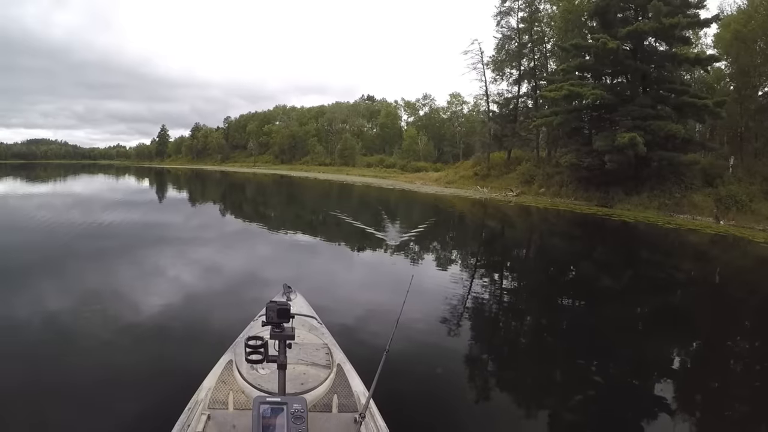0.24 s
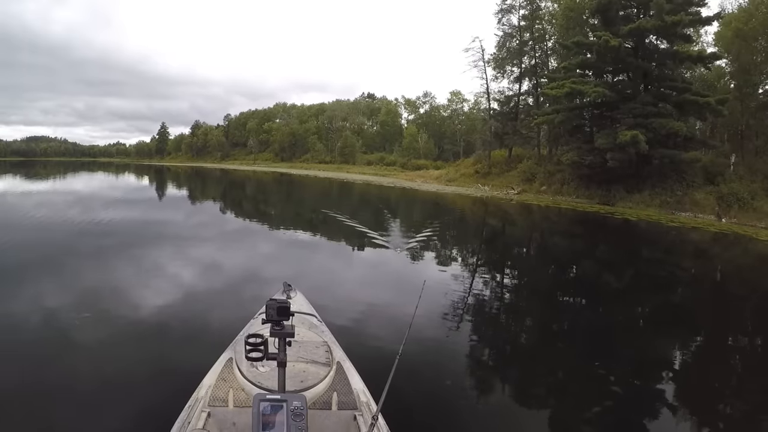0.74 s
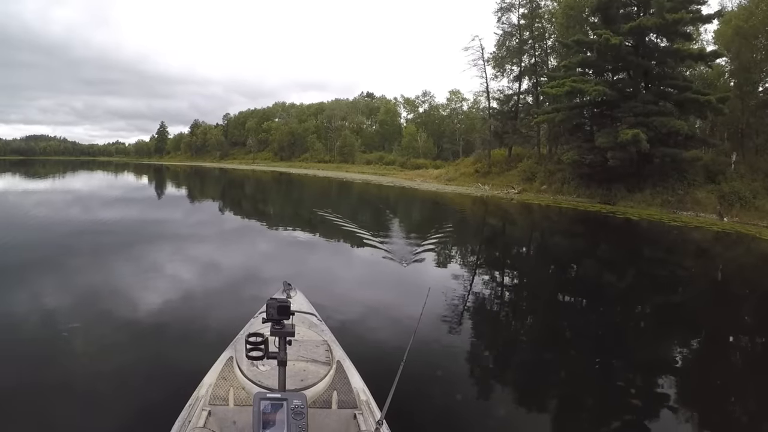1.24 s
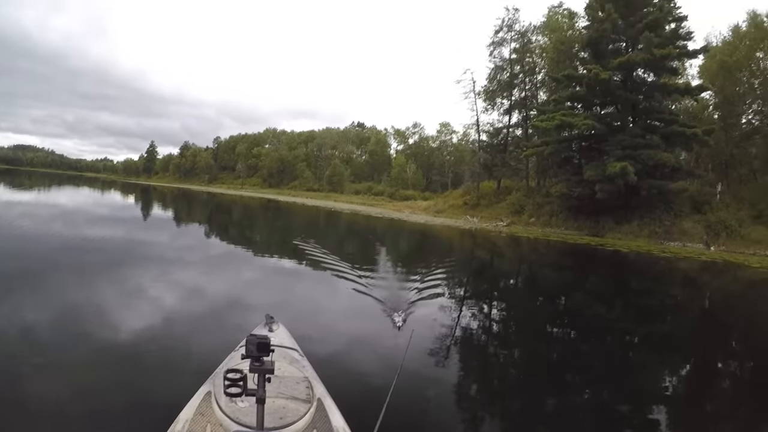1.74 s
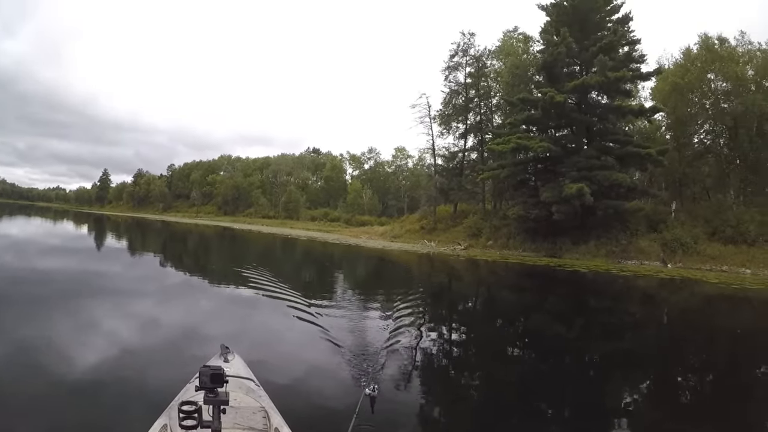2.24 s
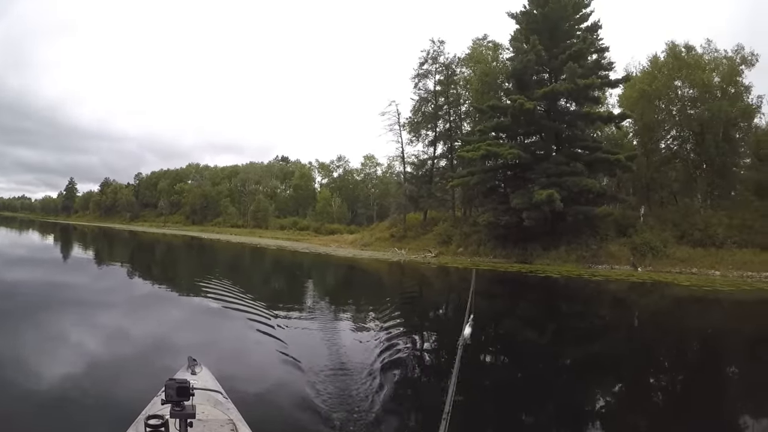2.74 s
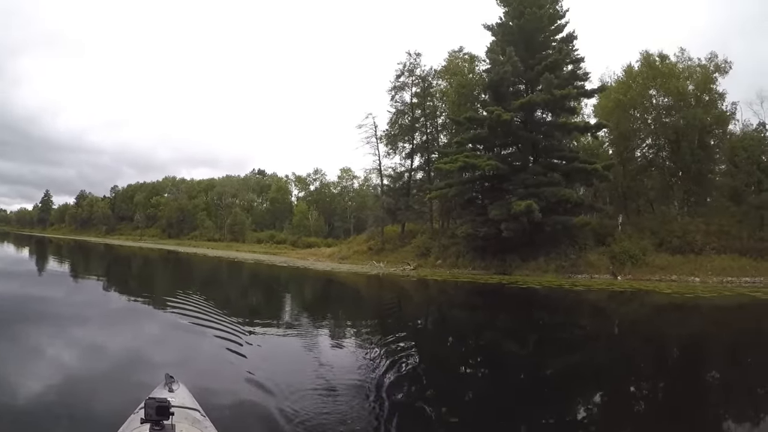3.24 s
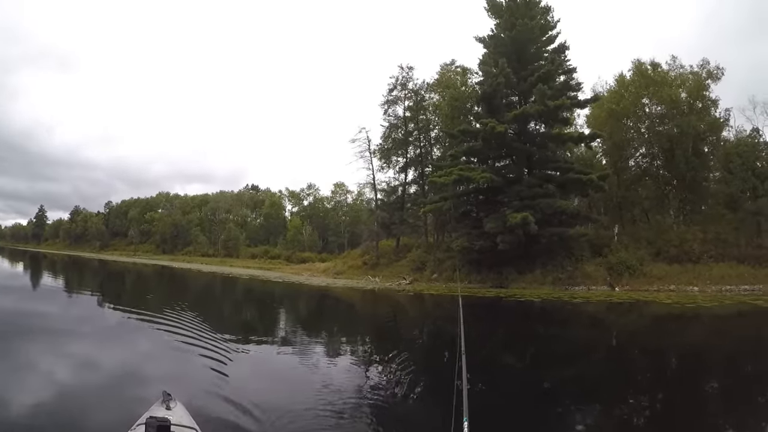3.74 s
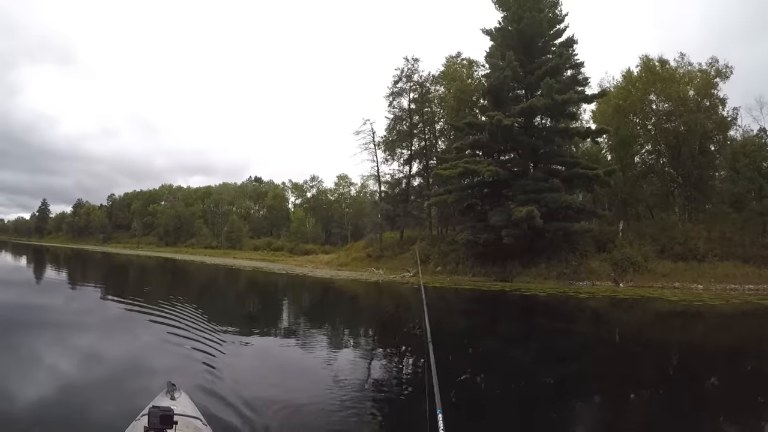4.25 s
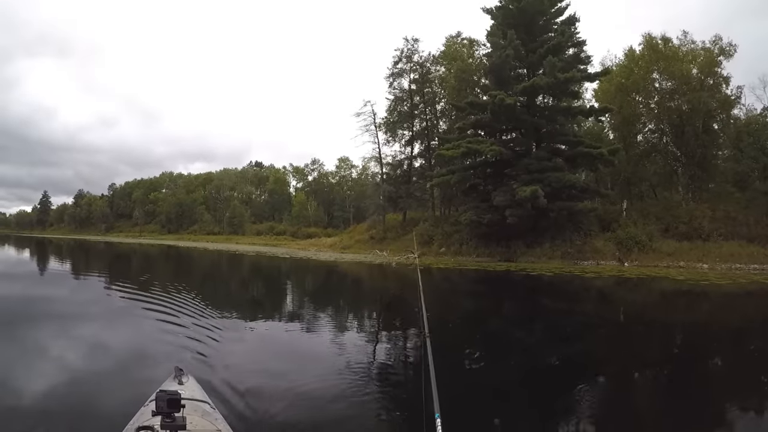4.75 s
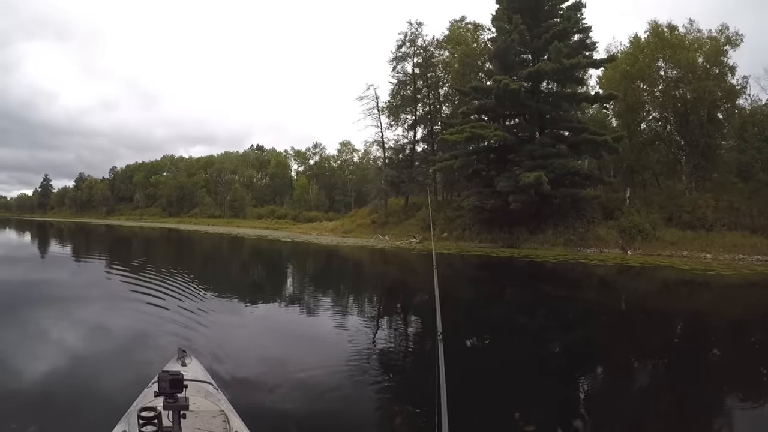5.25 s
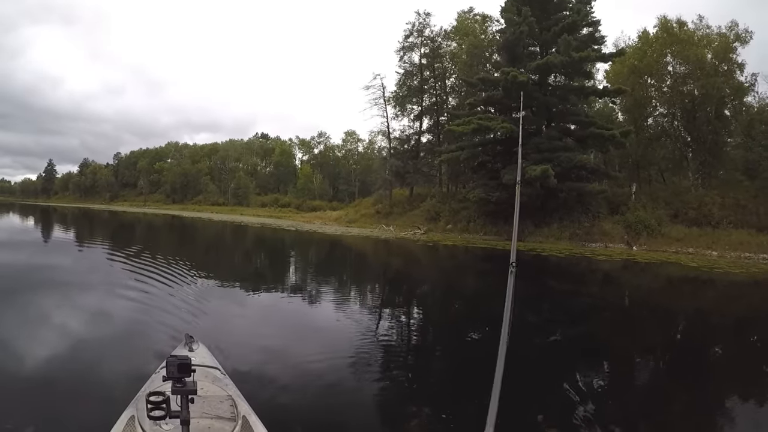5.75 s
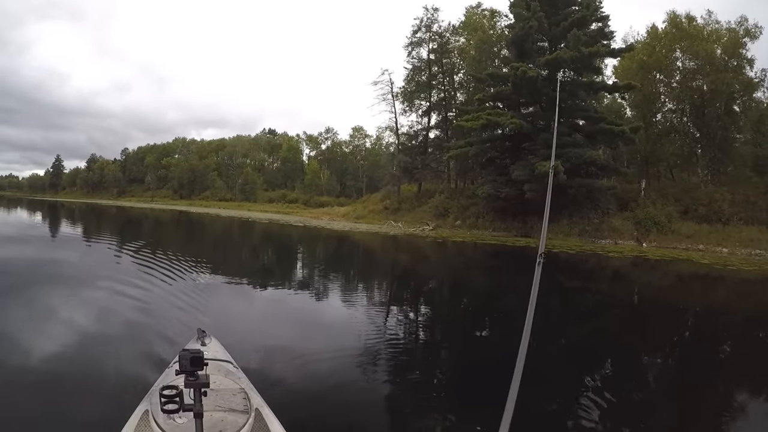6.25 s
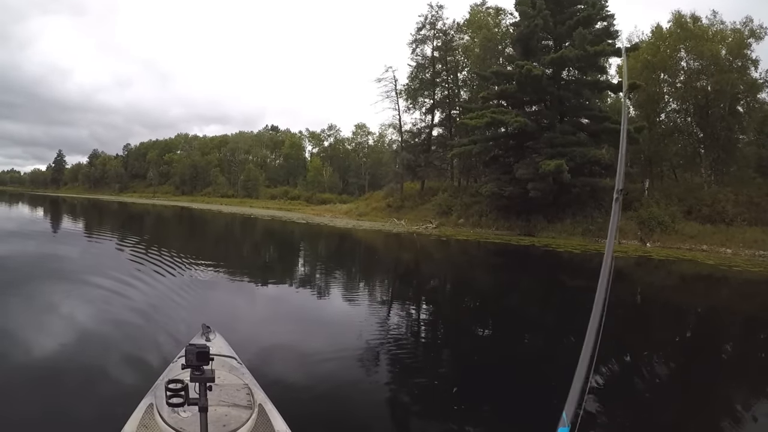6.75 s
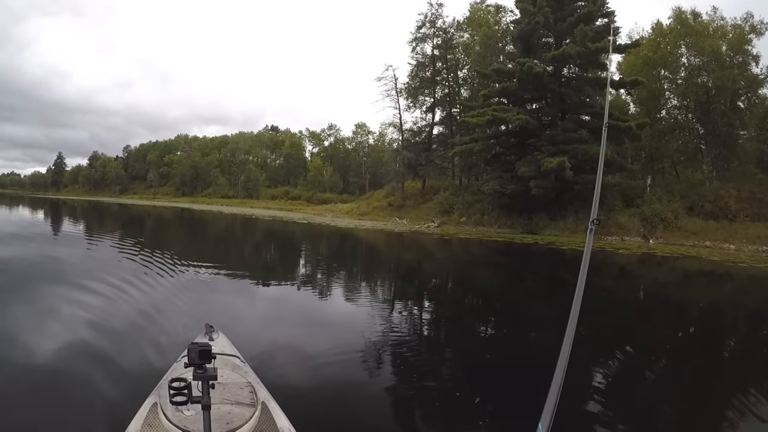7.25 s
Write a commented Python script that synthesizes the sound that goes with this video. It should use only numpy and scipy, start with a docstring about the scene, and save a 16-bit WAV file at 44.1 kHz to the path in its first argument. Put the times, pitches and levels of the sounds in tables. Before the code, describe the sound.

Water burbles louder and stops, a sharp metallic click and squeak, a whirring cast with gliding whine, a distant plop, then a hard reel clack.

```python
"""On a calm lake, an angler in a kayak winds a surface lure home; it gurgles louder and leaves the water.
The line squeaks, the spool is let go with a click, and the cast flies: line hisses off as filtered noise
while the reel's electronic brake whines down with the spool, as a set of steady and gliding tones.
The lure plops in far away as short swells of froth, the reel clacks into gear as struck metal, and faint
low chirps follow. Behind it all are lapping water, a faint high trill and the rumble and hiss of open air."""
import sys
import numpy as np
from scipy import signal
from scipy.fft import rfft, irfft
from scipy.io import wavfile

SR = 44100
rng = np.random.default_rng(int(sys.argv[2]) if len(sys.argv) > 2 else 0)


def int16_out(signal):
    """Quantize to a 16-bit WAV file."""
    q = np.round(np.clip(np.atleast_2d(signal).T, -1, 1) * 32767)
    wavfile.write(sys.argv[1], SR, q.astype(np.int16))


N = 329868
T = np.arange(N) / SR  # time of every sample, in seconds
EDGE_HZ = 13600  # top of the heard band

# the spool spins up, slows evenly in flight, then dies away under the thumb
LAUNCH_S, FLIGHT_S, THUMB_S, STOP_S = 3.55, 3.70, 4.425, 4.81
TOP_HZ, SAG_HZ_PER_S, SPIN_UP_S, THUMB_DECAY_S = 868, 525, .035, .272


def spool_speed():
    """The spool's speed through the cast, given as the pitch in Hz of the brake's generator."""
    spin_up = 1 - np.exp(-np.maximum(T - LAUNCH_S, 0) / SPIN_UP_S)
    flight = TOP_HZ - SAG_HZ_PER_S * (np.clip(T, FLIGHT_S, THUMB_S) - FLIGHT_S)
    thumb = np.exp(-np.maximum(T - THUMB_S, 0) / THUMB_DECAY_S)
    return 1 + spin_up * flight * thumb  # the 1 keeps it above zero


def running(rise_s, release_s=.02):
    """A gain that opens after the launch and shuts when the spool is stopped."""
    opening = np.clip((T - LAUNCH_S) / rise_s, 0, 1) ** 2
    return opening * np.clip(1 - (T - STOP_S) / release_s, 0, 1)


BRAKE_HZ = 974.9  # how often the brake switches
WHINE_RISE_S, WHINE_FULL_HZ = 0.28, 430  # slow build-up; the whine fades with speed below this pitch
# harmonics of the brake's switching, relative levels:
# multiple of the brake's rate, level at full speed/dB, level at low speed/dB
BRAKE_HARMONICS = [(1, -66, -65), (2, -66, -56.5), (3, -54, -70.5), (4, -66, -68), (5, -76, -63),
                   (7, -67.5, -64), (8, -73, -70), (9, -62, -73), (10, -73, -63), (11, -62.5, -63),
                   (12, -57, -62)]
# how well the housing sends out the gliding side tones: f/Hz, relative level/dB
HOUSING_RESPONSE = [(500, -88.5), (1200, -72), (1720, -53.5), (2230, -58), (2700, -58), (3300, -64.5),
                    (4100, -68), (4550, -58), (5200, -68), (6200, -78.5), (8500, -70), (10400, -65),
                    (11400, -62), (12400, -77)]


def whine(line_db=0.5, side_db=-1.5, slow_hz=520, fast_hz=760, fade_db=-8, flicker_db=2.5):
    """The brake chops the coil current: harmonics, with side tones one generator frequency away."""
    spool_hz = spool_speed() * (1 + 0.0052 * drift(60) + 0.013 * drift(400))
    speed = np.clip((spool_hz - slow_hz) / (fast_hz - slow_hz), 0, 1)
    chop = phase(BRAKE_HZ * (1 + 0.00044 * drift(70)))
    spin = phase(spool_hz)
    tones = np.zeros(N)
    for k, fast_level, slow_level in BRAKE_HARMONICS:
        level = line_db + slow_level + (fast_level - slow_level) * speed + 2.3 * drift(35)
        tones += amp(level) * np.sin(k * chop)
    # at low speed the side tones fade, except those around the second harmonic
    coasting = np.clip((slow_hz - spool_hz) / 170, 0, 1)
    for k in range(1, 13):
        for side in (-1, 1):
            hz = k * BRAKE_HZ + side * spool_hz
            fade = fade_db * coasting * (k != 2)
            level = side_db + read(HOUSING_RESPONSE, hz) + fade + flicker_db * drift(55)
            # the upper tone of each pair gets a lift and the lower a cut, most of all low down
            tilt = 6 * side * (1 - coasting) / (k + 2)
            tones += amp(level + tilt) * np.sin(k * chop + side * spin + k * k)
    gain = running(WHINE_RISE_S) * np.minimum(spool_hz / WHINE_FULL_HZ, 1) * amp(1.3 * drift(70))
    return np.sqrt(2) * tones * gain


def bearing(multiple=23, heard_hz=5400, octaves=0.62, level_db=-54):
    """A fuzzy whistle from the spool's bearing sinks into hearing as the spool runs down."""
    hz = multiple * spool_speed()
    heard = np.exp(-(np.log2(hz / heard_hz) / octaves) ** 2) * (T > THUMB_S)
    return amp(level_db + 2.0 * drift(90)) * heard * np.sin(phase(hz + 200 * drift(1200)))


RUSH_DB, RUSH_DB_PER_OCTAVE = -50.5, 6.5  # level at top speed, and growth per doubling of speed
FIZZ_DB, FIZZ_DB_PER_OCTAVE = -48.5, 4
# colour of the line's broad rush: f/Hz, relative level/dB per Hz
RUSH_COLOUR = [(120, -42), (200, -14), (274, -8), (324, -7.5), (616, -5.5), (807, -6.5), (1220, -7),
               (1390, -4.5), (1570, -3), (2480, -4.5), (6000, -13.5), (7800, -37), (13200, -120)]
# colour of the line's bright fizz: f/Hz, relative level/dB per Hz
FIZZ_COLOUR = [(2650, -25), (4500, -4), (6090, -8.5), (7690, -2), (8370, -4), (10800, -6.5), (12100, -17),
               (12300, -6), (14000, -25)]
# the line lashes at the throw and rubs as the thumb comes down:
# t/s, rise/s, fall/s, rush level/dB, fizz level/dB
LINE_SURGES = [(3.616, 0.039, .12, -36.5, -43), (4.415, 0.1, 0.081, -45, -49)]


def line(flutter=0.22, rise_s=0.068):
    """Line slaps through the guides, louder with speed and fluttering with each turn of the spool."""
    spool_hz = spool_speed()
    turn = 1 + flutter * np.sin(phase(spool_hz / 2))  # one turn per two generator cycles
    rush = colour(rng.standard_normal(N) * turn * amp(1.1 * drift(500)), RUSH_COLOUR)
    fizz = colour(rng.standard_normal(N) * turn * amp(2.0 * drift(900)), FIZZ_COLOUR)
    octaves, gate = np.log2(spool_hz / TOP_HZ), running(rise_s)
    rush_gain = gate * amp(RUSH_DB + RUSH_DB_PER_OCTAVE * octaves)
    fizz_gain = gate * amp(FIZZ_DB + FIZZ_DB_PER_OCTAVE * octaves)
    for s, rise, fall, rush_db, fizz_db in LINE_SURGES:
        surge = swell(s, rise, fall)
        rush_gain = np.hypot(rush_gain, amp(rush_db) * surge)
        fizz_gain = np.hypot(fizz_gain, amp(fizz_db) * surge)
    return (rush * rush_gain + fizz * fizz_gain) * amp(.8 * drift(45))


# ways the reel's frame and side plates ring: f/Hz, relative level/dB, time to fade by 60 dB/s
FRAME_MODES = [(612, 8, 0.036), (937, -2, 0.058), (1210, -11, 0.084), (1390, -8.5, 0.084), (1654, 3, 0.038),
               (1940, 3.5, 0.023), (2095, -10, 0.046), (2380, 2.5, 0.028), (2905, -2, 0.029),
               (3350, -0.5, 0.029), (3630, -8, 0.0266), (3870, -3, 0.028), (4610, -1, 0.025),
               (6120, -5.5, 0.04), (6400, -7, 0.028), (8012, 2, 0.021), (9000, 4.5, 0.018),
               (9670, -3, 0.018), (10050, -4, 0.0154), (11000, -16, .02)]
# blows of clutch, pinion and spool: t/s, level/dB, centre f/Hz, spread/octaves,
# crack's time to fade by 60 dB/s, relative frame level/dB, struck part's f/Hz, its relative level/dB
REEL_BLOWS = [(2.2440, -19, 7260, 0.31, .005, -19, 8000, -7), (2.887, -37, 3500, 1.4, .008, -3, 4100, -10),
              (2.9478, -16, 5700, .55, .012, -14, 5800, 2.5),
              (2.9484, -11.5, 4200, 0.63, .018, -8, 3540, 1.5),
              (2.9496, -9, 9500, 0.89, .012, -16, 10800, -2),
              (2.9500, -10, 2600, 1.9, 0.014, -21, 1753, -1.5),
              (2.9513, -18, 5500, .7, 0.013, -14, 4950, 0), (3.526, -22.5, 4300, 0.72, 0.069, -3, 4950, -2),
              (3.697, -30, 1500, 0.65, .07, -10, 1400, 5.5),
              (4.150, -28.5, 5000, 1.9, 0.041, -8, 4600, -14),
              (4.813, -23, 2770, 1.3, 0.026, -7.5, 2930, -4.5),
              (6.0025, -13, 3570, 0.89, 0.015, -2.5, 7060, -1.5),
              (6.0190, -13, 9000, 1.8, .017, -5, 9660, -6), (6.0215, -5, 5800, 1.2, 0.011, -2.5, 4270, -12),
              (6.0237, -13, 4000, 1.8, 0.016, -4.5, 9350, 4), (6.025, -21.5, 2500, .5, .03, -3, 2240, -2),
              (6.035, -27, 1590, 1.8, .05, 0.5, 1150, -15)]
# a blow also knocks the rod's grip, a moment later and much duller
KNOCK_S, KNOCK_DB, KNOCK_GROWTH = 0.00138, -11, 1.36  # delay, level for a 0 dB blow, dB per dB of blow
# the grip's knock: the columns of the blows from centre f/Hz onward
GRIP_KNOCK = (800, .7, 0.0743, -24, 880, -3.5)


def clicks(tail_db=-28, tail_t60=0.11, part_t60=0.0085):
    """Each blow cracks, rings struck part and frame, knocks the grip and scatters round the hull."""
    out, t = np.zeros(N), np.arange(8192) / SR
    f = np.fft.rfftfreq(len(t), 1 / SR) + 1
    frame = np.zeros(len(t))
    for k, (hz, db, t60) in enumerate(FRAME_MODES):
        frame += (-1) ** k * amp(db - 60 * t / t60) * np.sin(2 * np.pi * hz * t)
    frame = frame / abs(frame).max()
    lead = len(t) // 32  # room for the filter to spread ahead of the blow
    knocks = [(s + KNOCK_S, KNOCK_DB + KNOCK_GROWTH * db, *GRIP_KNOCK) for s, db, *_ in REEL_BLOWS]
    for s, db, centre_hz, spread, t60, frame_db, part_hz, part_db in list(REEL_BLOWS) + knocks:
        crack, scatter = rng.standard_normal((2, len(t))) / 2
        sound = amp(frame_db) * frame
        sound = sound + crack * amp(-2.5 - 60 * t / t60)
        sound = sound + scatter * amp(tail_db - 60 * t / tail_t60)
        # the hardness of the contact picks the band that is excited
        contact = 1 / (1 + (np.log2(f / centre_hz) / spread) ** 4) ** .5
        contact = contact / np.sqrt(np.mean(contact[f < EDGE_HZ] ** 2))
        shaped = irfft(rfft(np.roll(sound, lead)) * contact)
        add(out, s - lead / SR, amp(db) * shaped)
        ring_s = part_t60 * (3500 / part_hz) ** .5  # low parts ring longer
        onset = np.minimum(t * part_hz * 2, 1)
        flex = amp(db + part_db - 60 * t / ring_s) * np.sin(2 * np.pi * part_hz * t) * onset
        add(out, s, np.diff(flex) * SR / (2 * np.pi * part_hz))  # it radiates by its velocity
    return out


PITCH_SAG = 0.058  # share of its pitch that each tone loses as it sounds
# the line squeaks near 2.85 s, then faint low chirps come after 6 s, perhaps the reel's handle turning
# or a distant bird: t/s, length/s, f/Hz, level/dB
SQUEAKS_AND_CHIRPS = [(2.832, 0.0075, 6100, -37.5), (2.840, .005, 7750, -35), (2.845, .009, 8050, -37),
                      (2.849, 0.035, 7480, -37), (2.893, 0.0074, 7100, -42), (6.172, 0.054, 2050, -61),
                      (6.271, 0.047, 1750, -61), (6.368, .05, 2030, -60), (6.47, .05, 1700, -59)]


def squeaks_and_chirps(scrape_db=-12, waver=0.014):
    """Line squeaks, then low chirps: thin unsteady tones, each sagging in pitch, with a little scrape."""
    out, unsteady = np.zeros(N), 1 + waver * drift(1500)
    scrape_colour = [(800, -18), (4000, 1.0), (8500, 4), (12500, -16), (14000, -25)]  # f/Hz, level/dB
    scrape = colour(rng.standard_normal(N), scrape_colour)
    for s, length, hz, db in SQUEAKS_AND_CHIRPS:
        on = (T >= s) & (T < s + length)
        age = (T[on] - s) / length
        pitch = hz * unsteady[on] * (1 + PITCH_SAG * (.5 - age))
        tone = np.sqrt(2) * np.sin(phase(pitch))
        out[on] += amp(db) * np.sin(np.pi * age) * (tone + amp(scrape_db) * scrape[on])
    return out


CALM_DB = -65.5  # water lapping when nothing stirs it
# colour of the froth and small bubbles: f/Hz, relative level/dB per Hz
FROTH_COLOUR = [(120, -38), (200, -1.5), (395, -5), (768, -2.5), (1110, -9.5), (1460, -1), (2150, -8.5),
                (3160, -7.5), (6030, -17.5), (8110, -20), (13000, -30.5)]
# the loudest air bubbles, before an overall trim: t/s, level/dB, f/Hz
LOUD_BUBBLES = [(0.1217, -35, 2780), (0.2723, -34, 825), (0.876, -31, 2260), (0.9186, -34.5, 2330),
                (1.1192, -30, 2610), (1.2547, -28.5, 3030), (1.6184, -28.5, 840), (1.669, -31, 1760),
                (1.869, -20.5, 1480), (1.913, -32, 1500), (1.952, -26, 3680), (1.9872, -24, 1400),
                (2.003, -25, 1460), (2.024, -22.5, 4200), (2.0629, -27, 2430), (2.1168, -27, 1600),
                (2.1476, -22, 1400), (2.183, -18, 3110), (2.2067, -25, 3864), (2.2571, -25.5, 814),
                (2.3239, -28.5, 3620), (2.371, -25.5, 2370), (2.408, -29, 1660), (3.797, -38.5, 288),
                (4.8903, -28, 594), (6.884, -38.5, 763), (6.936, -37, 1240)]
# water stirred by the lure as it nears the boat and lifts out: t/s, level/dB
LURE_WAKE = [(0, -52), (.25, -48.5), (.45, -52.5), (1.0, -50), (1.45, -52), (1.64, -42.5), (1.86, -42.5),
             (2.02, -39.5), (2.27, -41.5), (2.45, -57), (2.6, -70)]
# the lure lands and stirs the water far away: t/s, rise/s, fall/s, level/dB
LURE_SPLASHES = [(4.905, 0.032, 0.021, -44), (5.27, 0.038, 0.029, -48), (6.93, 0.065, .05, -61)]


def water(per_s=600, size_db=4.5, froth_db=-8.5, small_db=-4, large_db=-.5):
    """Small bubbles swarm over soft froth, with gurgles and single larger bubbles standing out."""
    small, large = np.zeros(N), np.zeros(N)
    wake = amp(curve(LURE_WAKE, axis=1, outside=-120))
    churn = amp(CALM_DB) + wake
    for s, rise, fall, db in LURE_SPLASHES:
        churn = churn + amp(db) * swell(s, rise, fall)
    for when, pitch, size, ring in rng.random((int(per_s * N / SR), 4)):
        strength = amp(size_db * min(-np.log(1 - size), 3.2))
        hz = 440 * 20 ** pitch
        add(small, when * N / SR, strength * bubble(hz, 2 + 4 * ring, rise=0.022) * hz ** 0.65)
    for s, db, hz in LOUD_BUBBLES:
        add(large, s, amp(db + large_db) * bubble(hz, cycles=4.3 * (hz / 1500) ** 0.21, rise=0.009))
    froth = colour(rng.standard_normal(N) * amp(3.4 * drift(120)), FROTH_COLOUR)
    swarm = colour(small, FROTH_COLOUR)
    return churn * (amp(froth_db) * froth + amp(small_db) * swarm) + wake * gurgle() + large


GURGLE_PER_S, GURGLE_LOW_HZ, GURGLE_OCTAVES = 30, 561, 2.7  # the middling bubbles of the wake
GURGLE_DB, GURGLE_SPREAD_DB = 4.5, 4  # their strength over the wake's level, and its spread either way


def gurgle(cycles=11, rise=.045):
    """The lure keeps folding air into the water: rising chirps of many pitches at loose intervals."""
    out = np.zeros(N)
    for k, (when, pitch, size, glide) in enumerate(rng.random((int(GURGLE_PER_S * N / SR), 4))):
        hz = GURGLE_LOW_HZ * 2 ** (GURGLE_OCTAVES * pitch)
        db = GURGLE_DB + GURGLE_SPREAD_DB * (2 * size - 1)
        chirp = bubble(hz, cycles * (hz / 1500) ** .5, 2 * rise * glide)
        add(out, (k + 2 * when) / GURGLE_PER_S, amp(db) * chirp)
    return out


def bubble(hz, cycles, rise):
    """An air pocket rings for some cycles, its pitch rising as it nears the surface."""
    t = np.arange(3000) / SR
    age = t * hz / cycles
    onset = 1 - np.exp(-t * hz / 0.65)
    return onset * np.exp(-age) * np.sin(2 * np.pi * hz * t * (1 + rise * np.minimum(age, 6)))


def trill(per_s=64.5, hz=5330, sweep_hz=170, level_db=-66.0):
    """A faint trill, as of an insect on the shore: short chirps, each falling in pitch as it sounds."""
    beat = phase(per_s * (1 + 0.0525 * drift(40)))
    pitch = hz - sweep_hz * np.sin(beat) + 70 * drift(150)
    return amp(level_db + drift(60)) * unit((1 + np.cos(beat)) * np.sin(phase(pitch)))


AIR_DB = -51
# colour of the still air over the lake: f/Hz, relative level/dB per Hz
AIR_COLOUR = [(18, -82), (30, -48.5), (59, -27.5), (84, -4.5), (111, -1.5), (201, -5.5), (241, -7),
              (482, -12.5), (577, -12.5), (708, -14.5), (2910, -23), (5260, -25.5), (5830, -26.5),
              (10800, -32), (14000, -43)]


def air():
    """Low rumble and hiss of the open lake, as gently wavering coloured noise."""
    return amp(AIR_DB) * colour(rng.standard_normal(N) * amp(.5 * drift(11)), AIR_COLOUR)


# colour of the hiss that differs between left and right: f/Hz, relative level/dB per Hz
WIDE_AIR_COLOUR = [(35, -42), (60, -14), (104, -5.5), (417, -4.5), (467, -5), (3030, -9.5), (10600, -16.5),
                   (11900, -23), (14000, -49)]


def wide_air(level_db=-66):
    """Hiss that reaches the two ears with opposite signs, so the open air sounds wide."""
    return amp(level_db) * colour(rng.standard_normal(N), WIDE_AIR_COLOUR)


def amp(db):
    """Decibels to gain."""
    return 10 ** (np.asarray(db) / 20)


def unit(x):
    """Scales to an rms (average strength) of 1."""
    return x / np.sqrt(np.mean(x ** 2) + 1e-20)


def read(points, hz):
    """A spectrum's value at hz, joining its points on a log-frequency axis."""
    f, value = np.transpose(points)
    return np.interp(np.log(hz + 1), np.log(f + 1), value)


def curve(rows, axis, outside=None):
    """One column of a time table at every sample."""
    columns = np.transpose(rows)
    return np.interp(T, columns[0], columns[axis], outside, outside)


def colour(x, points):
    """Filters x by a spectrum, then scales it to rms 1."""
    gain = amp(read(points, np.fft.rfftfreq(N, 1 / SR)))
    return unit(irfft(rfft(x) * gain, N))


def drift(rate_hz):
    """Random wandering of rms 1, with rate_hz new random values a second."""
    knots = rng.standard_normal(N // 8)
    return unit(np.interp(T * rate_hz, np.arange(len(knots)), knots))


def phase(hz):
    """Running angle of a moving frequency."""
    return 2 * np.pi * np.cumsum(hz) / SR


def swell(s, rise_s, fall_s):
    """A gain that grows to 1 at time s and dies away."""
    return np.exp(-np.maximum((s - T) / rise_s, (T - s) / fall_s))


def add(mix, s, sound):
    """Mixes a sound in at time s."""
    part = mix[max(round(s * SR), 0):][:len(sound)]
    part += sound[:len(part)]


def scene():
    """All sounds sit dead centre; only a part of the open air's hiss has width."""
    cast = whine() + bearing() + line() + clicks() + squeaks_and_chirps()
    centre = cast + water() + trill() + air()
    side = wide_air()
    return np.array([centre + side, centre - side])


def record(dry):
    """The microphones trim the deepest bass and roll off the top; then a low-pass limits the band."""
    points = [(30, -2), (70, 2.0), (10800, 0.5), (12200, -8.5), (13500, -23)]  # f/Hz, level/dB
    response = amp(read(points, np.fft.rfftfreq(N, 1 / SR)))
    heard = irfft(rfft(dry) * response, N)
    low_pass = signal.firwin(255, EDGE_HZ, window=("kaiser", 9), fs=SR)
    return signal.oaconvolve(heard, low_pass[None], "same")


dry = scene()
out = record(dry)
int16_out(out)
```